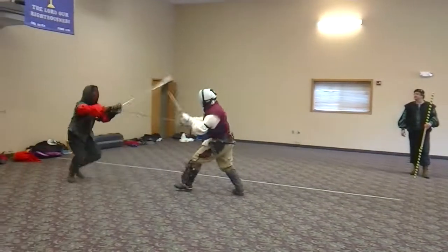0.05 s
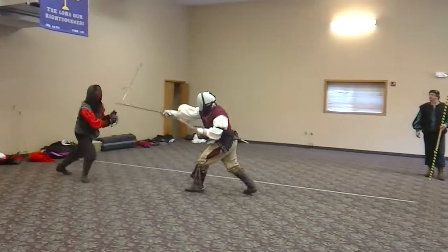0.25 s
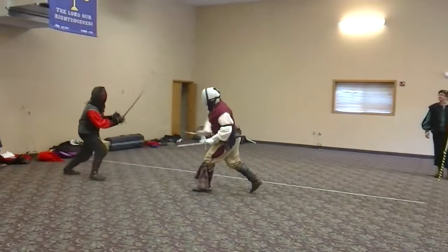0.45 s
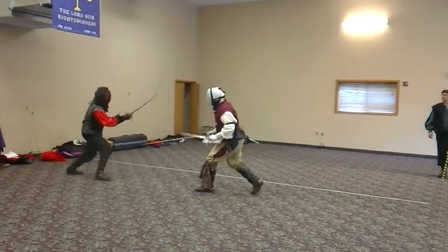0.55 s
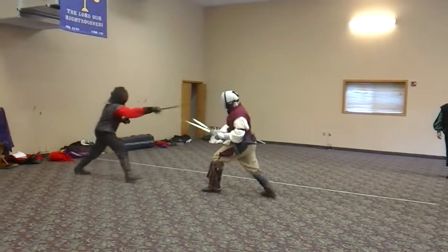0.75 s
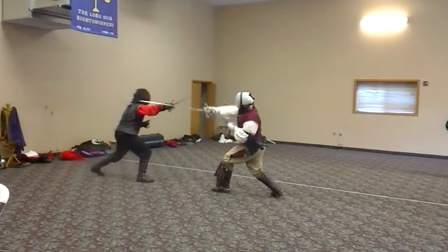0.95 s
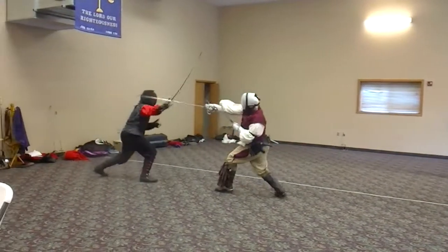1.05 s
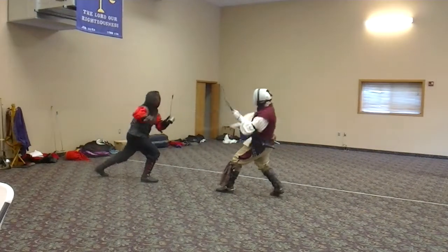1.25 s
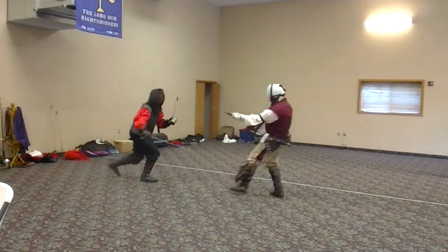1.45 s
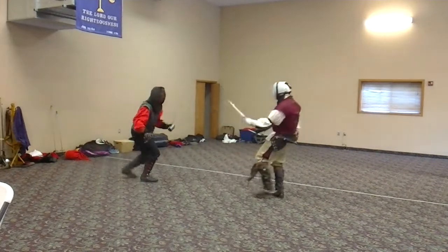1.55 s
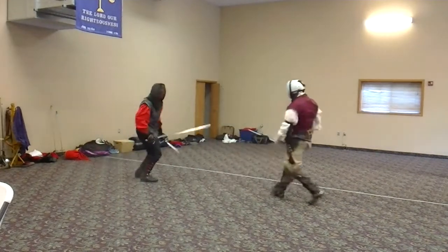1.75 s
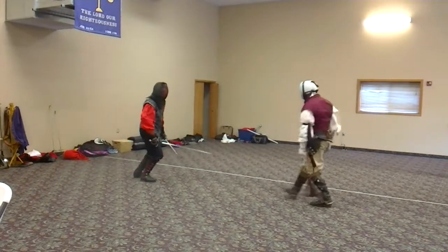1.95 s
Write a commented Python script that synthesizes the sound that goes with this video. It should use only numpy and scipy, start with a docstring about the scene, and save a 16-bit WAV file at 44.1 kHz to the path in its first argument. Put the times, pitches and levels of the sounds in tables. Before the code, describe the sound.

Steel fencing blades clash twice, ringing in a large hall, with dull knocks close by.

```python
"""In a large carpeted hall, two fencers cross steel blades twice. Each clash is a quick run of
contacts that click, set the blades ringing and echo around the room. Shoes scuff the carpet and
gear rattles faintly. Dull knocks sound close by, probably from a hand-held camera.
Behind it all are a low rumble, a soft hiss and a thin whine that swells and fades."""
import sys
import numpy as np
from scipy import signal
from scipy.fft import rfft, irfft, next_fast_len
from scipy.io import wavfile
from scipy.ndimage import uniform_filter1d, minimum_filter1d

SR = 44100
rng = np.random.default_rng(int(sys.argv[2]) if len(sys.argv) > 2 else 0)


def pcm_store(signal):
    """Save signal as 16-bit PCM."""
    levels = np.round(np.clip(np.atleast_2d(signal), -1, 1) * 32767)
    wavfile.write(sys.argv[1], SR, levels.astype(np.int16).T)


N = 88200

# A fade time (t60) is how many seconds a sound takes to drop by 60 dB.
# The tone colour of each noise. Each row: frequency in Hz, level in dB.
RUMBLE_COLOUR = [(20, 7.5), (60, -16), (200, -7), (400, -5), (1500, -39), (8000, -70)]
ROOM_COLOUR = [(60, -37), (150, 3.5), (400, -3), (600, 6), (850, 0), (1200, -2), (2000, -3), (4000, -73),
               (12000, -70)]
HISS_COLOUR = [(100, -23), (400, -27), (1200, 0.5), (1900, 2), (3000, -2.5), (5000, -2), (6700, -0.5),
               (8300, -6), (10200, -11), (11300, -37), (16000, -52)]
CRACK_COLOUR = [(500, -12), (1400, 6), (2400, -3), (3100, -8), (4200, -20), (6000, -43), (12000, -60)]
GEAR_COLOUR = [(1500, -12), (4500, -12), (5500, -3.5), (6500, 8.5), (7200, 6.5), (8000, -3.5), (10000, -7),
               (11500, -30), (16000, -39)]
CARPET_COLOUR = [(60, -49), (150, -1.5), (280, 3.5), (400, -3), (540, 2), (800, -7), (1200, -45),
                 (4000, -45)]
SOLE_COLOUR = [(200, -27), (420, -20), (520, 9), (640, -1.5), (850, -15), (1200, -29), (3000, -63)]
SCRAPE_COLOUR = [(6000, -30), (10000, -18), (12000, -2), (12650, -4), (13300, -5), (15500, -20),
                 (17000, -43)]
STEEL_COLOUR = [(300, -50), (1300, -25), (2000, -3), (2600, -7), (3500, -2.5), (4200, -2.5), (6800, 4),
                (8100, -3.5), (10000, -11), (11500, -23), (14000, -42), (17000, -62)]
# How alike left and right are. Each row: frequency in Hz, likeness from -1 to 1.
STEREO_LIKENESS = [(100, -0.28), (600, 0.36), (1300, -0.39), (3400, 0.26), (5500, 0.27), (7000, -0.0059),
                   (9500, 0), (13000, 0.48)]
# How the background swells and fades. Each row: time in seconds, level in dB.
ROOM_LEVEL = [(0, -51), (.2, -52.5), (.38, -55), (.55, -47), (.8, -54.5), (.95, -57), (1.15, -56.5),
              (1.35, -54.5), (1.7, -59), (1.9, -65.5), (2, -61.5)]
HISS_LEVEL = [(0, -52), (.7, -50), (1.5, -51.5), (1.8, -55.5), (2, -51.5)]
WHINE_LEVEL = [(0, -52.5), (.18, -66), (.56, -75), (.71, -38), (.8, -54.5), (1.03, -50), (1.13, -42),
               (1.26, -55.5), (1.35, -41.5), (1.49, -54), (1.58, -54.5), (1.72, -66), (2, -82)]
# The tones in the whine. Each row: pitch in Hz, level in dB.
WHINE_TONES = [(9100, -7), (9270, -8), (9490, -1), (9565, 0), (9725, -9), (10400, -7)]
# Close knocks. Each row: start in seconds, level in dB, tick level in dB relative to that.
KNOCKS = [(.1976, -11, -48), (0.3038, 0.5, -32.5), (0.7629, -2.5, -67), (1.2281, -2, -33),
          (1.3944, -10, -42), (1.4265, -25, -45), (1.4524, -23.5, -56), (1.5025, -2, -20.5),
          (1.5409, -19.5, -45)]
# Bursts of rubbing. Each row: start in seconds, level in dB, fade time in seconds.
GEAR_RATTLES = [(.59, -45, 0.96), (.762, -37.5, 0.11), (1.135, -35, 0.17), (1.312, -42.5, 0.35),
                (1.43, -38, 0.13), (1.53, -40, 0.093), (1.576, -34.5, 0.069), (1.598, -46, 0.28),
                (1.865, -43.5, 0.47), (1.895, -47.5, 0.22)]
SHOE_STEPS = [(.44, -53, 0.88), (1.41, -49, 0.59)]
SOLE_DRAGS = [(.615, -42, 0.23), (.6405, -29, 0.074)]
BLADE_SCRAPES = [(.2138, -26, 0.029), (.2245, -35.5, 0.1), (.844, -42, 0.19)]
# The tones a struck object rings with. Each row: pitch in Hz, level in dB, fade time in seconds.
CASE_TONES = [(136.3, -44, 0.22), (178.5, -34, 0.15), (280.2, -30.5, 0.11), (480, -38, 0.19),
              (537.5, -31.5, 0.075), (652.6, -8.5, .017), (747, -23, 0.038), (994, -40.5, 0.1)]
BLADE_TONES = [(3183, -5, .55), (3300, -5, .6), (3386, 1, .75), (3565, -1, .95), (3652, 3, .9),
               (3743, 3, .8), (4070, -5, .4), (4651, -5, .6), (5030, -5, .5), (5416, -3, .6),
               (5960, -4, .45), (6277, -2, .55), (6720, -3, .5), (6853, 3, .6), (7040, 1, .55),
               (7500, -4, .45), (8030, -6, .35)]
# How long the hall echoes. Each row: frequency in Hz, fade time in seconds.
HALL_FADE = [(200, 1), (2000, 1), (4000, 0.86), (7000, 0.59), (10000, 0.52), (15000, 0.15)]
# Which side the echo and ringing lean to. Each row: frequency in Hz, right minus left in dB.
HALL_SIDE = [(1300, 30), (2000, 3.5), (3400, -3.5), (5000, -1), (7000, 9), (8300, -3), (12000, -6)]
# Blade hitting blade. Each row: start in seconds, level in dB, boosted frequency in Hz,
# the click's right minus left in dB, extra level for echo and ringing in dB.
CONTACTS = [(0.2063, -19.5, 6800, 14, 6), (.2066, -14, 3480, 12, 5.5), (0.2156, -21.5, 5800, 18, 9),
            (.2158, -24, 3600, -32, 12), (.2353, -39, 6850, 3, -14), (.2733, -11, 8400, 0, -4.5),
            (.2820, -11.5, 5370, 5, -5.5), (.2901, -20, 7000, 20, 1.5), (.8118, -28.5, 6600, -5, -2.5),
            (.8228, -29.5, 6700, 5, -4.5), (.8438, -11.5, 3900, 0, -3), (.8526, -12.5, 3970, 6, -5),
            (.8558, -17.5, 4200, -2, 4.5), (.9016, -10.5, 7300, 5, -1), (.9204, -11, 7040, 4.5, -5),
            (.9468, -23, 6600, 3, -3), (.9538, -15, 5400, 2.5, 3), (1.105, -25, 7000, 5, -1.5)]

SHARP_RISE_S = .00069  # how fast a hard hit starts


def amp(db):
    """Turn decibels into a number to multiply by."""
    return 10 ** (np.asarray(db) / 20)


def unit(x):
    """Scale a sound to an average strength (rms) of 1."""
    return x / np.sqrt(np.mean(x ** 2) + 1e-20)


def along(points, hz):
    """Look up a frequency in a table, blending between rows by pitch."""
    row_hz, values = np.transpose(points)
    return np.interp(np.log(hz + 1), np.log(row_hz + 1), values)


def level(points):
    """Turn rows of time and dB into a volume curve."""
    return amp(np.interp(np.arange(N) / SR, *np.transpose(points)))


def since(start):
    """Seconds since the start, zero before it."""
    return np.maximum(np.arange(N) / SR - start, 0)


def fade(t, rise_s, t60):
    """Rise quickly, then die away."""
    return (1 - np.exp(-t / rise_s)) * amp(-60 * t / t60)


def filtered(x, response):
    """Multiply each frequency in x by its response."""
    size = next_fast_len(N + 8192)
    return irfft(rfft(x, size) * response(np.fft.rfftfreq(size, 1 / SR)), size)[..., :N]


def pan(db):
    """Left and right volumes; positive dB leans right."""
    return amp(np.array([[-.5], [.5]]) * db)


def noise(colour):
    """Stereo noise; colour gives the dB at each frequency."""
    def response(hz):
        width = np.arccos(np.clip(along(STEREO_LIKENESS, hz), -1, 1)) / 2
        return amp(colour(hz)) * [np.cos(width), np.sin(width)]
    mid, side = filtered(rng.standard_normal((2, N)), response)
    return unit(np.array([mid + side, mid - side]))


def tone(t, hz, flutter_hz):
    """A stereo tone that wavers at random, flutter_hz times a second."""
    draws = rng.standard_normal((4, int(N * flutter_hz / SR) + 2))
    position = np.arange(N) * flutter_hz / SR
    waver = np.array([np.interp(position, np.arange(len(row)), row) for row in draws])
    angle = (2 * np.pi * hz * t).astype(np.float32)
    return waver[:2] * np.sin(angle) + waver[2:] * np.cos(angle)


def rubs(events, colour, rise_s, grain_db):
    """Rubbing makes bursts of noise; more grain_db makes them rougher."""
    power = sum((amp(db) * fade(since(start), rise_s, t60)) ** 2 for start, db, t60 in events)
    lumps = uniform_filter1d(uniform_filter1d(rng.standard_normal(N), size=110), size=60)
    grain = amp(grain_db * unit(lumps))
    return np.sqrt(power) * unit(grain * noise(lambda hz: along(colour, hz)))


def background():
    """The room's low noise and hiss drift in level over a steady rumble."""
    room = level(ROOM_LEVEL) * noise(lambda hz: along(ROOM_COLOUR, hz))
    hiss = level(HISS_LEVEL) * noise(lambda hz: along(HISS_COLOUR, hz))
    rumble = amp(-60.5) * noise(lambda hz: along(RUMBLE_COLOUR, hz))
    return room + hiss + rumble


def whine():
    """A few high, wavering tones swell and fade together."""
    tones = sum(amp(db) * tone(since(0), hz, flutter_hz=110) for hz, db in WHINE_TONES)
    return level(WHINE_LEVEL) * unit(tones)


def knocks():
    """Each dull knock rings the same small case; a hard one adds a tick."""
    rise_s, tick_hz, low_cut_hz = .0016, 1310, 80
    out = np.zeros((2, N))
    for start, db, tick_db in KNOCKS:
        t = since(start)
        body = sum(amp(tone_db) * fade(t, rise_s, t60) * np.sin(2 * np.pi * hz * t)
                   for hz, tone_db, t60 in CASE_TONES)
        tick = fade(t, rise_s, t60=.036) * np.sin(2 * np.pi * tick_hz * t)
        crack = amp(-3.5) * fade(t, SHARP_RISE_S, t60=.019) * noise(lambda hz: along(CRACK_COLOUR, hz))
        out += amp(db) * (body + amp(tick_db) * (tick + crack))
    return signal.sosfilt(signal.butter(2, low_cut_hz, 'high', fs=SR, output='sos'), out)


def gear():
    """The fencers' gear rattles in faint, bright bursts."""
    return rubs(GEAR_RATTLES, GEAR_COLOUR, rise_s=.0074, grain_db=3.5)


def shoes():
    """Shoes scuff the carpet, and a sole drags over it."""
    steps = rubs(SHOE_STEPS, CARPET_COLOUR, rise_s=.0054, grain_db=-.5)
    drags = rubs(SOLE_DRAGS, SOLE_COLOUR, rise_s=.0017, grain_db=-2)
    return steps + drags


def scrapes():
    """One steel edge slides along the other with a very high rasp."""
    return rubs(BLADE_SCRAPES, SCRAPE_COLOUR, SHARP_RISE_S, grain_db=-2.5)


def hall(steady_noise, start):
    """The hall answers a hit with early echoes, then a tail that grows duller."""
    hz, times, spectrum = signal.stft(steady_noise, SR, nperseg=256)
    decay = amp(-60 * np.maximum(times - start, 0) / along(HALL_FADE, hz)[:, None])
    tail = signal.istft(spectrum * decay, SR, nperseg=256)[1][:, :N]
    t = since(start)
    build_up = 1 - np.exp(-t / .025)
    early = steady_noise * fade(t, SHARP_RISE_S, t60=.11)
    return amp(-11) * early + amp(-13.5) * tail * build_up


def focus(hz, centre_hz, octaves=.2):
    """A hump from 0 to 1 around the frequency that a hit boosts."""
    return np.exp(-.5 * (np.log2((hz + 1) / centre_hz) / octaves) ** 2)


def ring(t, centre_hz):
    """The blade's tones flutter as the steel whips about; those near centre_hz get a boost."""
    out = np.zeros((2, N))
    for hz, db, t60 in BLADE_TONES:
        strength = amp(db + 10.5 * focus(hz, centre_hz))
        out += strength * fade(t, SHARP_RISE_S, t60) * tone(t, hz, flutter_hz=28)
    return out / np.sqrt(2)


def click(start, colour):
    """A hard tap with brief chatter. Low waves travel slower along the blade, so the pitch falls."""
    chirp_s, on_time_hz = .0012, 10000  # frequencies below on_time_hz arrive late
    tap = np.arange(N) == round(start * SR)
    chatter = noise(np.zeros_like) * fade(since(start), SHARP_RISE_S, t60=.008)
    force = tap + amp(4) * chatter / np.linalg.norm(chatter[0])
    lag_cycles = lambda hz: chirp_s * (2 * np.sqrt(hz * on_time_hz) - hz)
    out = filtered(force, lambda hz: amp(colour(hz)) * np.exp(-2j * np.pi * lag_cycles(hz)))
    return out / np.linalg.norm(out) * np.sqrt(2 * SR / 1000)  # the energy of 1 ms at strength 1


def blades():
    """Each contact makes a click, rings the steel and echoes in the hall."""
    clicks, lingering = np.zeros((2, N)), np.zeros((2, N))
    for start, db, centre_hz, side_db, extra_db in CONTACTS:
        colour = lambda hz: along(STEEL_COLOUR, hz) + 8.5 * focus(hz, centre_hz)
        # The click has a clearer pitch than its echo.
        click_colour = lambda hz: colour(hz) + 4 * focus(hz, centre_hz)
        clicks += amp(db) * pan(side_db) * click(start, click_colour)
        echo = hall(noise(colour), start)
        ringing = amp(-30.5) * ring(since(start), centre_hz)
        lingering += amp(db + extra_db) * (echo + ringing)
    return clicks + filtered(lingering, lambda hz: pan(along(HALL_SIDE, hz)))


def scene():
    """Add up all the sounds, from the background to the blades."""
    return background() + whine() + knocks() + gear() + shoes() + scrapes() + blades()


def record(dry):
    """Turn the volume down briefly on the hardest hits, then cut the highest treble."""
    limit, top_hz = .95, 16500
    needed = limit / np.maximum(np.abs(dry).max(axis=0), limit)
    gain = uniform_filter1d(minimum_filter1d(needed, size=90), size=90)
    return filtered(dry * gain, lambda hz: hz < top_hz)


dry = scene()
out = record(dry)
pcm_store(out)
```